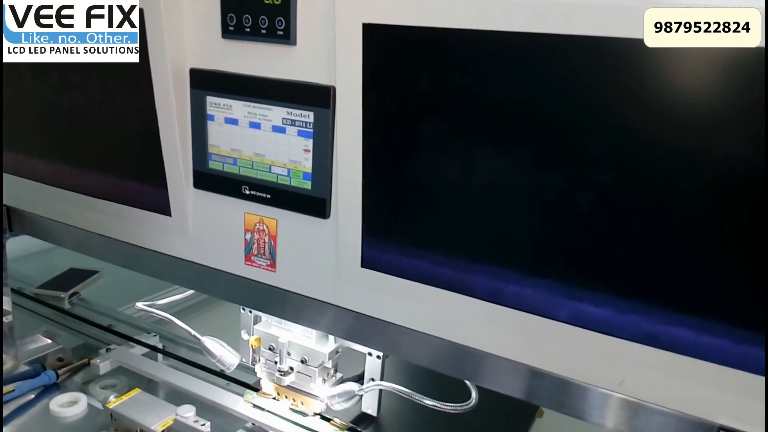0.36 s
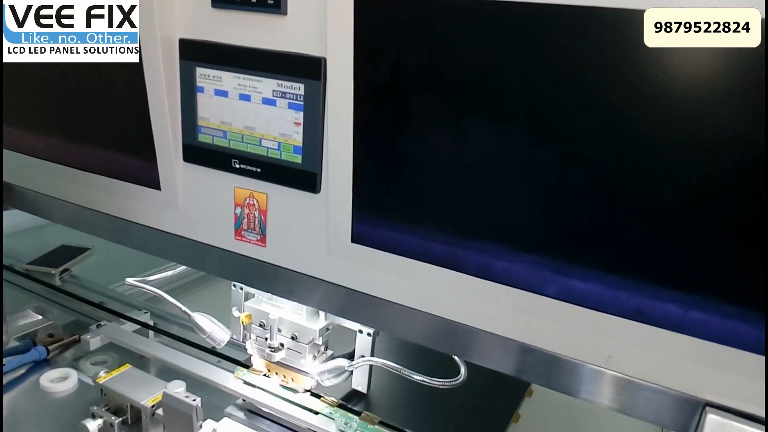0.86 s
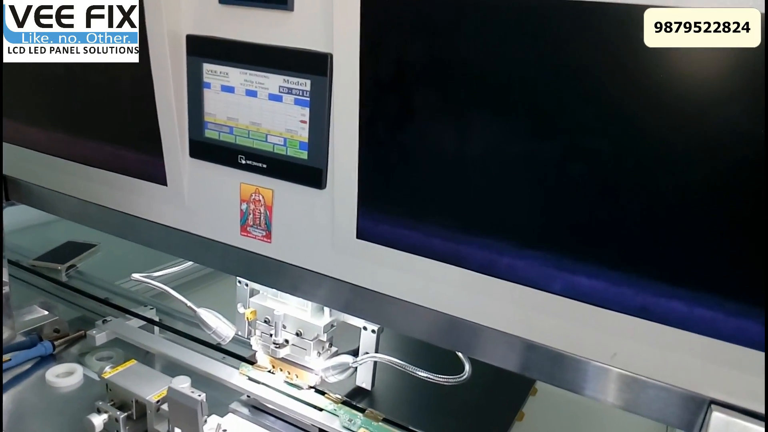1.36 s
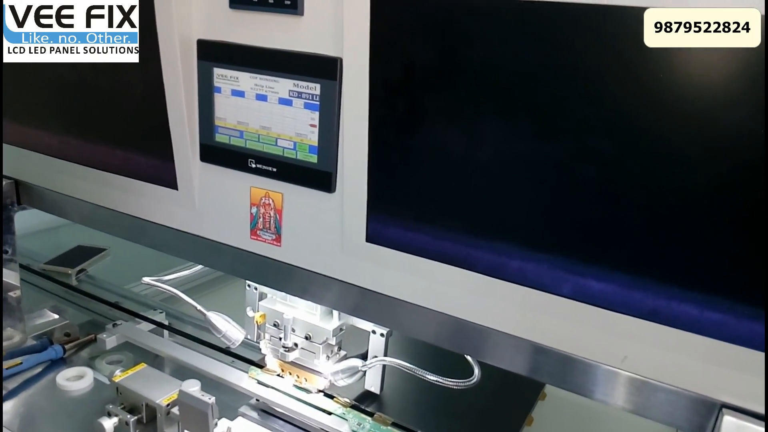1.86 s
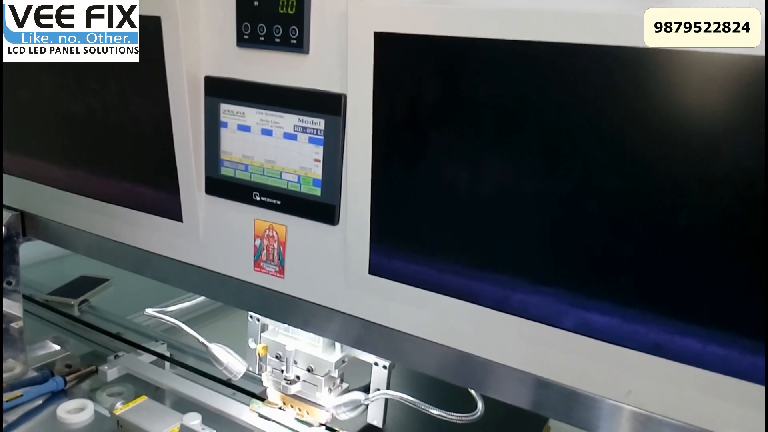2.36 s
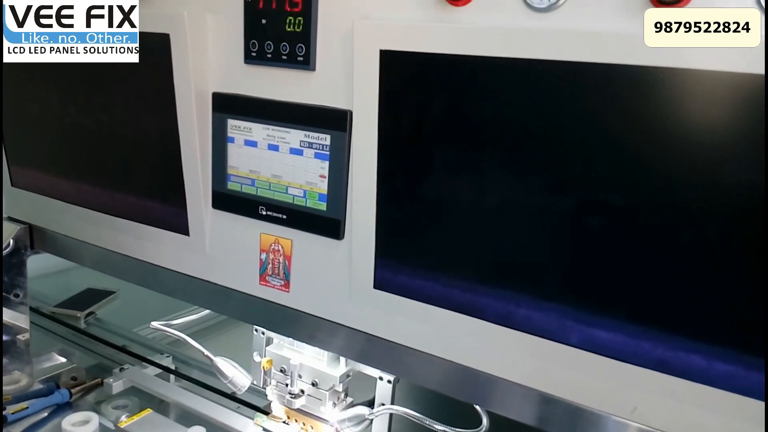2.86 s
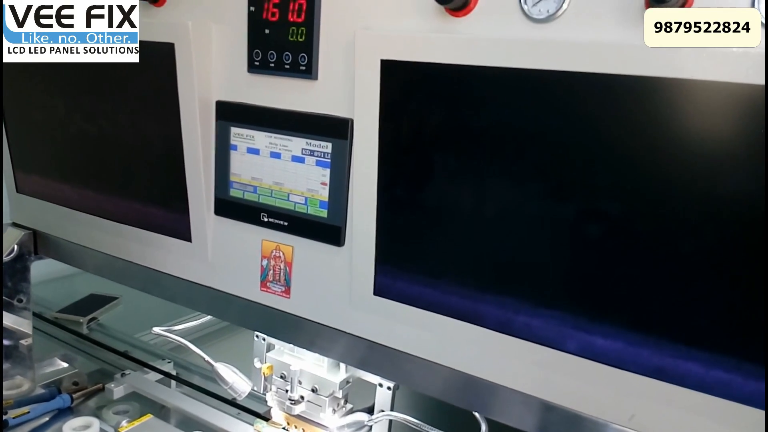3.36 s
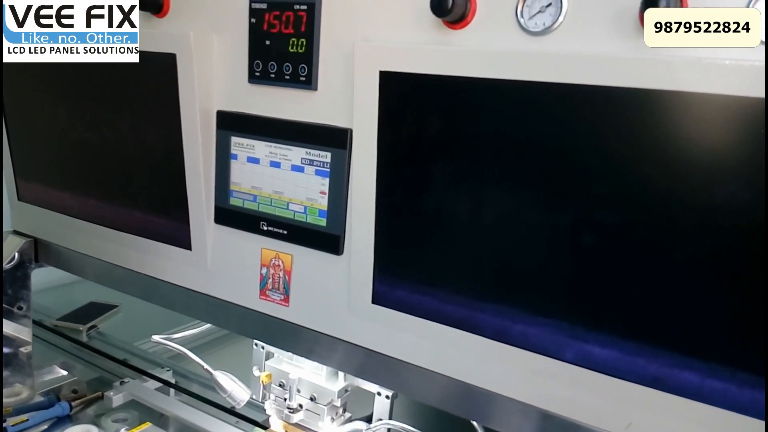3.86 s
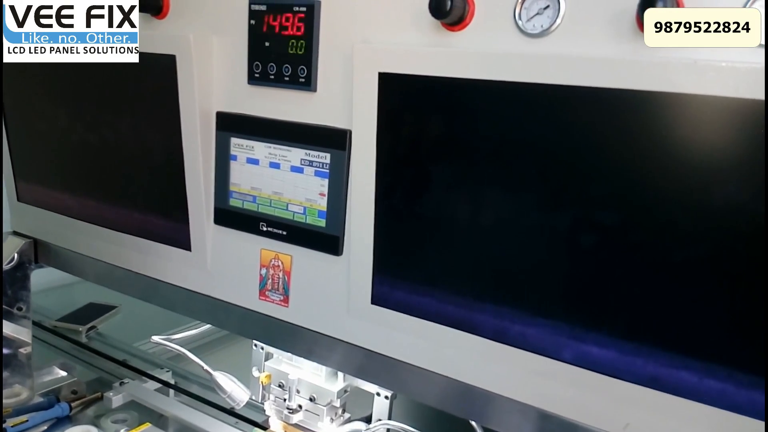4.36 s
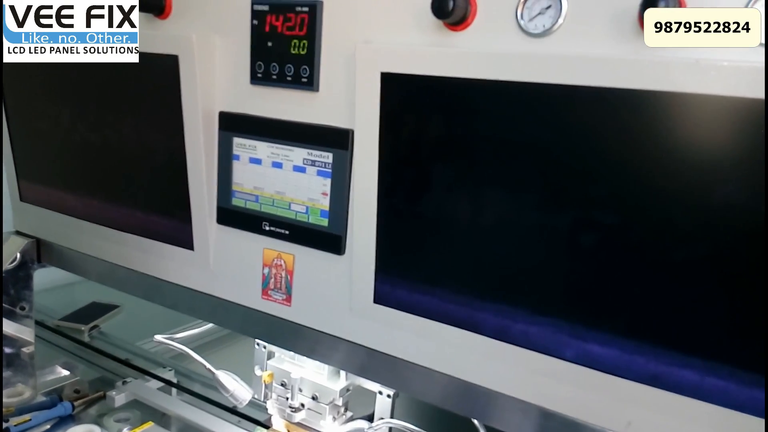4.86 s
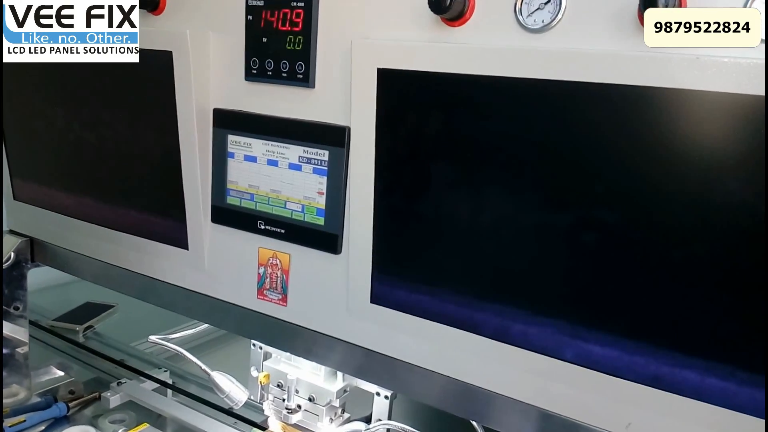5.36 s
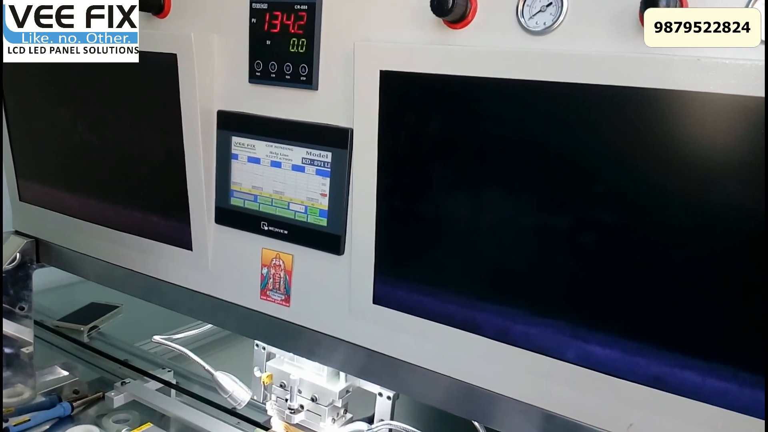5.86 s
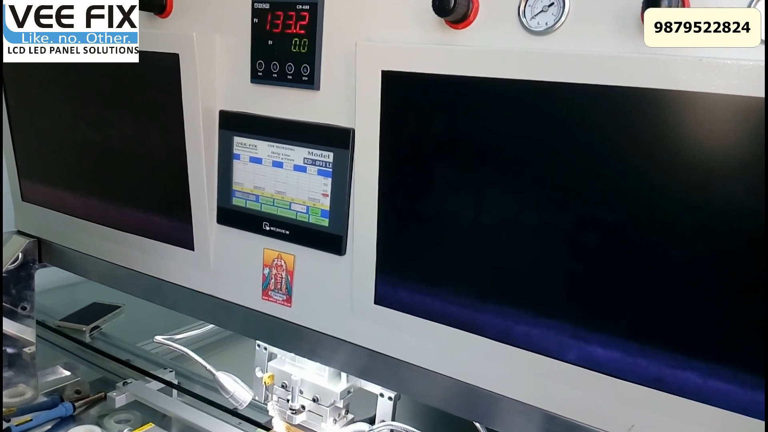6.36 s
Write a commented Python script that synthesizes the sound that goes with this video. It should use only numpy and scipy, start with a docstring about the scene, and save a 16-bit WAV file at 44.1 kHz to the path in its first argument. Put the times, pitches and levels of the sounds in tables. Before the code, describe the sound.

Compressed air hisses loudly and evenly from a machine head in a hard-walled workshop, bright and ringing, over faint fan rumble and mains hum.

```python
"""Compressed air blows through the nozzles of a machine head in a hard-walled workshop.
It starts slightly strong and settles within a few tenths of a second, over fan rumble and faint mains hum.
The hiss rings the cavities of the head while it sags slowly; near 4.8 s its level dips briefly.
A hand-held pair of microphones drifts a little throughout, so the room's fine colour keeps shifting.
The jet is filtered noise with echoes at two ports; the hum is a few wavering sines."""
import sys
import numpy as np
from scipy import signal
from scipy.fft import rfft, irfft
from scipy.io import wavfile
from scipy.ndimage import uniform_filter1d

SR = 44100
rng = np.random.default_rng(int(sys.argv[2]) if len(sys.argv) > 2 else 0)


def wav_out(sig):
    """Save sig, one row per channel (or a flat mono array), as 16-bit PCM at SR to the path in sys.argv[1]."""
    wavfile.write(sys.argv[1], SR, np.round(np.clip(np.atleast_2d(sig).T, -1, 1) * 32767).astype(np.int16))


def amplitude_ratio(level_db):
    """Convert a level in decibels to the matching linear amplitude (field) ratio."""
    exponent = np.asarray(level_db, float) / 20
    return 10 ** exponent


N = 297234
T = np.arange(N) / SR  # s
SIDE = np.array([[0.5], [-0.5]])  # shares a left-right difference in dB between the ports


def evened(x):
    """Scales to rms 1."""
    return x / np.sqrt(np.mean(abs(x) ** 2) + 1e-20)


def read(points, hz):
    """Reads the columns of a table on a log-frequency axis."""
    f, *columns = np.transpose(points)
    return np.squeeze([np.interp(np.log(hz + 1), np.log(f + 1), c) for c in columns])


def wander(t, low_hz, high_hz):
    """Slow chance: sines of random phase, the slow ones larger."""
    total = np.zeros(len(t))
    for f in np.geomspace(low_hz, high_hz, num=30):
        total += np.sin(2 * np.pi * (f * t + rng.random())) / np.sqrt(f)
    return evened(total)


def turbulence(patchy_db=1.0, flicker_db=0.35, top_flicker_db=-0.3):
    """Three unrelated jets of flat noise, their strength uneven in patches and in gusts with an extra top flicker."""
    size, hop = 512, 128  # samples
    frames, hz = N // hop + 5, np.fft.rfftfreq(size, 1 / SR)
    real, imaginary, patches = rng.standard_normal((frames, len(hz), 3, 3)).T
    patches = uniform_filter1d(patches, size=8, axis=1)  # over frequency
    patches = evened(uniform_filter1d(patches, size=24, axis=2))  # over time
    t = np.arange(frames) * hop / SR
    top = np.clip((hz[:, None] - 9000) / 5000, 0, 1)  # full from 14 kHz
    field_db = patchy_db * patches + flicker_db * wander(t, 3, 60)
    field_db += top * top_flicker_db * wander(t, 5.6, 100)
    spectra = (real + 1j * imaginary) * amplitude_ratio(field_db)
    jets = signal.istft(spectra, nperseg=size, noverlap=size - hop)[1]
    return evened(jets[:, :N])


def tails():
    """Two unrelated echo tails of energy 1, each band dying at its own speed."""
    # decay of the hard-walled room: (f/Hz, t60/s)
    room = [(200, 0.64), (2000, 0.51), (8000, 0.31), (15000, 0.24)]
    hz, t, z = signal.stft(rng.standard_normal((2, SR // 2)), SR, nperseg=256)
    z = z * amplitude_ratio(-60 * t / read(room, hz)[:, None])
    z /= np.linalg.norm(z, axis=2, keepdims=True)  # every band equally strong
    tail = signal.istft(z, SR, nperseg=256)[1]
    return tail / np.linalg.norm(tail, axis=1, keepdims=True)


def workshop(jets, direct_db=-9):
    """Spectra at both ports: the direct sound plus echoes that change as the microphones drift."""
    # likeness of the room sound at the two ports: (f/Hz, left-right likeness/1)
    likeness = [(100, 0.95), (300, 0.88), (500, 0.82), (800, 0.75), (1000, 0.3), (2000, 0.029)]
    one_nozzle = 0.7  # share of the echoes from the nearest nozzle, in amplitude
    drift_hz = 0.1  # rate of the hand's drift
    lag_s = 0.0001797  # the right port is nearer the head, so the left hears it later

    nearest = jets[0]
    echoes = np.zeros((2, N))
    for k in range(3):
        # fades between three sets of tails; the squares of the windows sum to 1
        window = np.sqrt(2 / 3) * np.cos(2 * np.pi * (drift_hz * T + k / 3))
        echoes += signal.fftconvolve((nearest * window)[None], tails(), axes=1)[:, :N]
    # the echoes of the many other nozzles blend into smooth noise
    echoes = one_nozzle * echoes + np.sqrt(1 - one_nozzle ** 2) * jets[1:]

    hz = np.fft.rfftfreq(N, 1 / SR)
    one, other = rfft(echoes)
    same = np.clip(read(likeness, hz), 0, 1)  # long waves reach both ports alike
    second = same * one + np.sqrt(1 - same ** 2) * other
    both = np.array([one, second]) + amplitude_ratio(direct_db) * rfft(nearest)
    both[0] *= np.exp(-2j * np.pi * hz * lag_s)
    return hz, both


def jet_level_db():
    """Level of the jet: a stronger start, a slow sag with the supply pressure and one brief dip."""
    level_db, sag_db_per_s = -16.5, 0.08
    surge_db, surge_s = 2.5, 0.095  # extra at the start; time constant of its settling
    dip_at_s, dip_half_s, dip_db = 4.83, 0.035, -0.89
    surge = surge_db * np.exp(-T / surge_s)
    dip = dip_db * np.exp(-((T - dip_at_s) / dip_half_s) ** 2)
    return level_db - sag_db_per_s * T + surge + dip


def air():
    """The jet, coloured for each port by its broad spectrum, the ringing cavities and a fan's blade tone."""
    # broad jet noise over the fan rumble: (f/Hz, relative density level/dB, left-right/dB)
    broad = [(90, -41, -3), (190, -32, -4), (230, -28, 1.5), (328, -26, 1.5), (414, -30, -0.5),
             (700, -22.5, -2), (1220, -24.5, -0.5), (1830, -17, -0.5), (2215, -8, -5), (3900, -10, 1),
             (5500, -5.5, 1.5), (7380, -12, 6), (9670, -19, -1.5), (13500, -19, -5)]
    # cavities of the head and microphone ports that the hiss rings:
    # (f/Hz, width at -6 dB/Hz, relative peak level/dB, left-right/dB)
    cavities = [(134, 30, -30.9, -0.2), (163, 15, -33.3, -1.0), (736, 36, -21.3, 2.9),
                (2436, 345, -9.5, 1.1), (2807, 512, -11.5, -5.1), (4197, 234, -7.3, -5.5),
                (4519, 400, -5.9, -0.7), (4868, 160, -5.9, 5.9), (5009, 160, -2.8, -1.3),
                (5139, 100, -2.6, 9.0), (5772, 30, -16.0, 8.8), (6144, 125, -8.6, 12.0),
                (6449, 623, -3.2, 2.3), (6922, 200, -14.6, 12.0), (7167, 160, -9.8, 6.5),
                (8319, 175, -20.7, 7.4), (8686, 391, -15.9, -1.3), (10883, 500, -18.6, -5.7),
                (12123, 150, -23.7, -12.0), (14150, 358, -19.1, -5.6), (14554, 443, -8.6, -9.2),
                (15007, 600, -7.6, -7.6), (15420, 500, -6.5, -7.2)]
    fan = (735, 8, -17, 0)  # blade tone of a cabinet fan as a narrow band, same columns
    left_db = 0.2  # the left port hears the jet louder

    hz, both = workshop(turbulence())
    db, balance_db = read(broad, hz)
    power = amplitude_ratio(db + SIDE * balance_db) ** 2
    for f, width, db, balance_db in [*cavities, fan]:
        resonance = 1 / (1 + (2 * (hz - f) / width) ** 2) ** 2
        power += amplitude_ratio(db + SIDE * balance_db) ** 2 * resonance
    steady = evened(irfft(both * np.sqrt(power), N))
    return steady * amplitude_ratio(jet_level_db() + SIDE * left_db)


def hum():
    """Mains multiples from transformers and fan motors, wavering in level."""
    # (multiple of the mains frequency/1, rms level before wavering/dB, left-right/dB)
    multiples = [(1, -74, 0), (2, -76, 0), (4, -64.5, -4), (6, -69, -5)]
    mains_hz, waver_rms_db = 50.1, 1.6
    out = np.zeros((2, N))
    for k, db, balance_db in multiples:
        tone = np.sqrt(2) * np.sin(2 * np.pi * (k * mains_hz * T + rng.random()))
        coarse = T[::512]
        waver_db = waver_rms_db * np.interp(T, coarse, wander(coarse, 0.2, 3))
        out += tone * amplitude_ratio(db + waver_db + SIDE * balance_db)
    return out


def scene():
    """Jet and hum in the workshop, as they reach the two ports."""
    return air() + hum()


def roll_off(x):
    """The treble ends steeply here."""
    return signal.sosfilt(signal.butter(12, 16880, fs=SR, output="sos"), x)


def record(dry):
    """The recorder's steep low-pass takes away the highest treble."""
    edge_hz = 15490
    low_pass = signal.firwin(1023, edge_hz, window=("kaiser", 9), fs=SR)
    limited = signal.oaconvolve(dry, low_pass[None], "same")
    return roll_off(limited)


dry = scene()
out = record(dry)
wav_out(out)
```